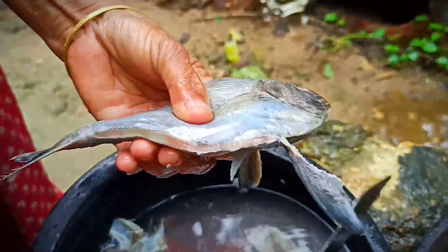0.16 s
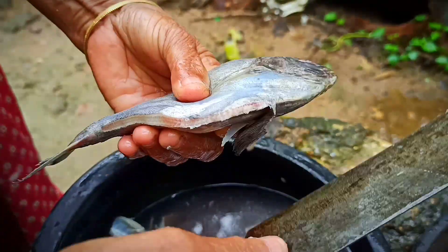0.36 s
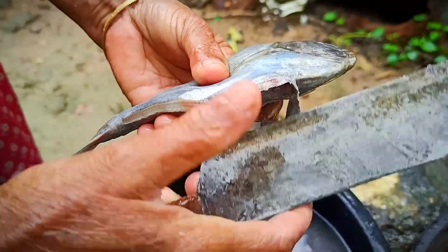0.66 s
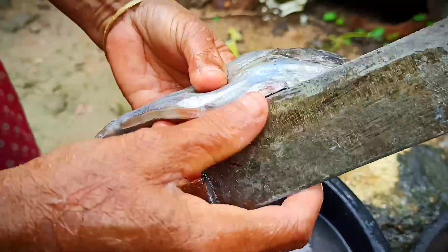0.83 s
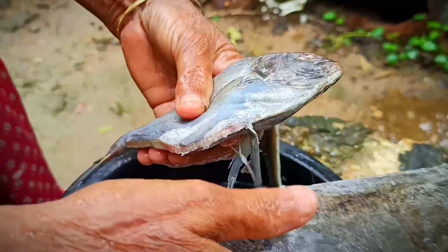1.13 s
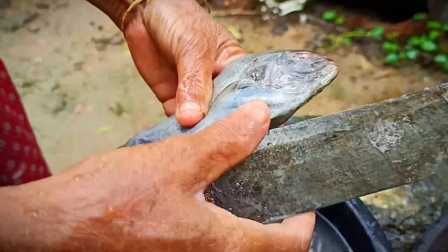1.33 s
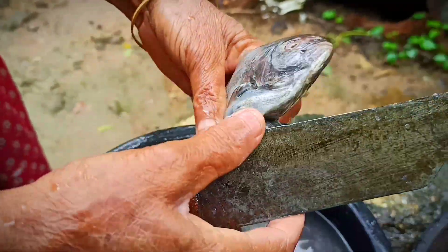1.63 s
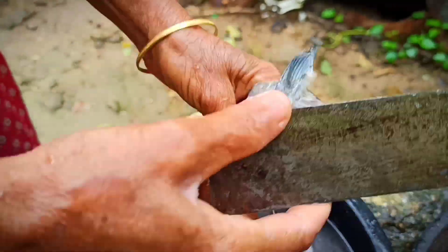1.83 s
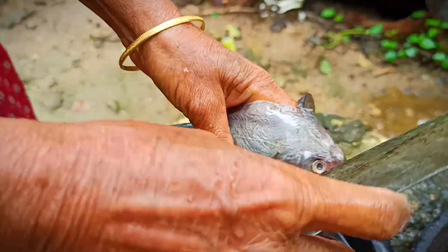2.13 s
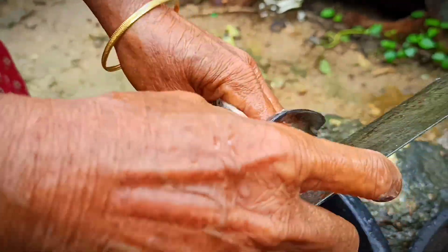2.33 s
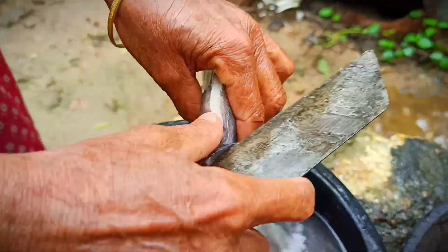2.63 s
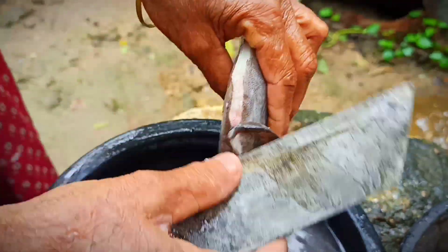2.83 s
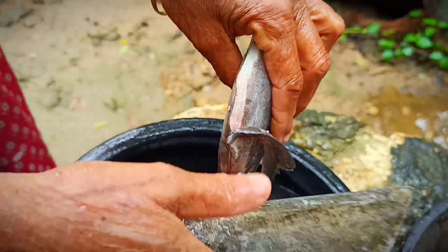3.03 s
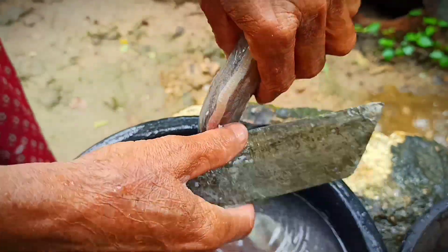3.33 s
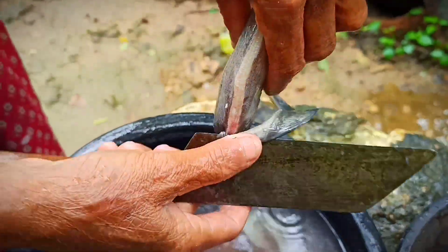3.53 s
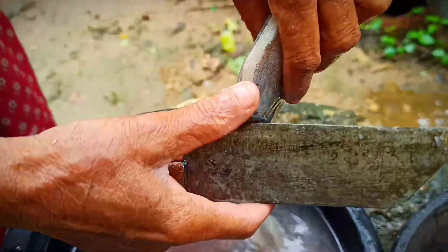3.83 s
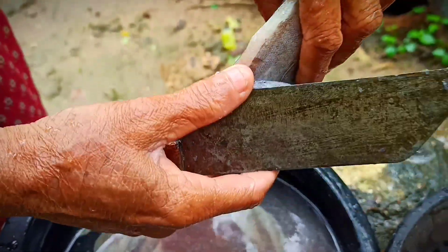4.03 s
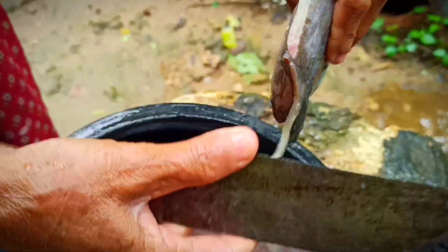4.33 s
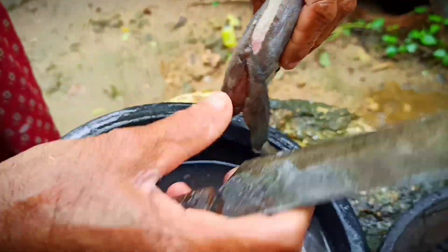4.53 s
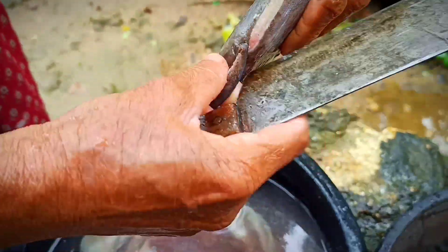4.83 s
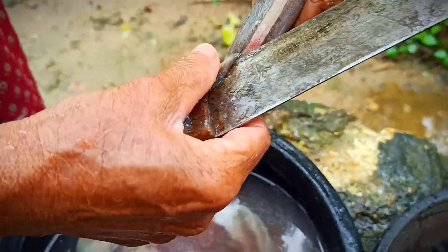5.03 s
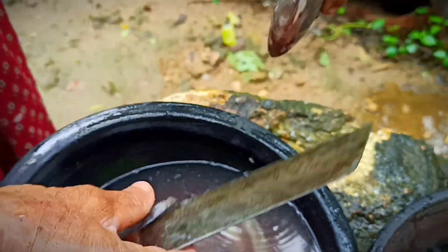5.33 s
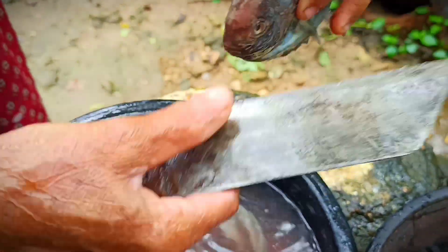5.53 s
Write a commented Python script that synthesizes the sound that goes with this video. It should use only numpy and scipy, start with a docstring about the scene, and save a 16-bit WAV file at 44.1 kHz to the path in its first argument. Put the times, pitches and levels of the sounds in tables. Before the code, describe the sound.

A large knife works on a fish close to the microphone, over a steady outdoor rush. Right at the start comes the loudest moment: the edge rasps over the scales, scales and fin rays snap, the steel rings briefly, the flesh thuds softly and the blade slips off with a zip. Two drops fall into a basin of water at about 0.2 and 0.3 seconds. A far bird chirps faintly until about 1.3 seconds, and again from 2.2 seconds on. Light scrapes and skims over wet skin from 0.9 seconds lead to a few clicks and a second firm, crackling bite near 1.9 seconds. Two more small drops land around 3 seconds. A short scrape with a snap follows at 4.3 seconds, then a small tick and a faint stroke near 5 seconds. A last cluster of snaps comes at 5.6 seconds.

```python
"""Over a steady outdoor rush, a large knife bites into a fish held above a basin, close to a phone.
The edge rasps over the scales, scales and fin rays snap, the steel rings and the flesh thuds softly;
the edge slips off with a zip. Two drops fall and a far bird starts its faint chirps. Light strokes
and skims lead to a second firm bite near 1.9 s and two more drops near 3 s. A short scrape follows
at 4.3 s, and a last cluster of snaps closes the scene at 5.6 s."""
import sys
import numpy as np
from scipy import signal
from scipy.fft import rfft, irfft
from scipy.io import wavfile
from scipy.ndimage import uniform_filter1d, map_coordinates

SR = 44100
rng = np.random.default_rng(int(sys.argv[2]) if len(sys.argv) > 2 else 0)


def waveform_to_disk(signal):
    """Save audio, clipped to [-1, 1], as 16-bit WAV at the path in sys.argv[1]."""
    frames = np.transpose(np.atleast_2d(signal))
    scaled = np.clip(frames, -1, 1) * 32767
    samples = np.round(scaled).astype(np.int16)
    wavfile.write(sys.argv[1], SR, samples)


N = 250488
TIME = np.arange(N) / SR
RING_TIME = TIME[:SR // 4]  # time axis of one short hit
TOP_HZ = 15650

# spectrum of the outdoor rush: (frequency [Hz], relative level [dB])
RUSH_SPECTRUM = [(18, -26), (30, -32), (48, -7.5), (90, -1.5), (145, 0.5), (270, -6), (390, -6),
                 (480, -8.5), (740, -9), (1000, -14), (1250, -14.5), (1750, -13), (2500, -15.5),
                 (6000, -16), (11000, -24.5), (13000, -27.5), (15500, -14.5)]
# strokes of the edge over the scales:
# (time of peak pressure [s], rise [s], level [dB], rasp pitch [Hz], send to the blade [dB])
STROKES = [ (0.011, 0.018, -38, 3120, 5), (0.036, 0.021, -34.5, 4500, 4), (0.208, 0.0226, -51, 3600, -12),
           (0.934, 0.022, -53.5, 3540, 6), (1.565, 0.016, -51.5, 3720, -5.5),
           (1.879, 0.015, -39.5, 3100, 1.5), (1.911, 0.005, -39, 3480, -14),
           (1.945, 0.028, -54, 2770, -16.5), (2.156, 0.017, -59, 4060, 7),
           (4.298, 0.007, -50.5, 4170, -0.5), (5.050, 0.020, -60, 3800, -2), ]
# scales and fin rays snapping: (time [s], level [dB], pitch [Hz], crack relative to level [dB])
SNAPS = [ (0.0025, -29, 2130, 2), (0.0168, -27, 3390, -18), (0.0214, -23, 2835, -7), (0.027, -15, 4800, -8),
         (0.0433, -14, 4250, -10), (0.0547, -26, 3080, 8), (0.1737, -30.5, 3600, -5),
         (1.5630, -38, 3400, -7.5), (1.7673, -43.5, 3700, -2.5), (1.7739, -37.5, 3730, 3.5),
         (1.7890, -37, 4100, -3), (1.8780, -30, 1773, 0.5), (1.9088, -29.5, 2515, -5),
         (1.9092, -29, 3700, -2.5), (1.9146, -30, 4295, -14), (4.2887, -42, 2730, -4),
         (4.2949, -30, 4041, -6), (4.2958, -41, 2170, -13), (4.5380, -43, 4100, -3),
         (5.5843, -40, 4450, -4), (5.6096, -29.5, 2330, -8), (5.613, -26.5, 4223, -9), ]
# modes of the steel, damped by hand and fish: (frequency [Hz], relative gain [dB], t60 [s])
BLADE_MODES = [(1547, 9, .05), (2087, 10.5, 0.058), (2230, -13, 0.041), (2768, 4, 0.067), (2986, 4, 0.087),
               (3023, 6, 0.17), (3512, 11, 0.072), (3990, 13, 0.099), (4213, 4, 0.063), (4596, 7, 0.038),
               (4980, 13.5, 0.067), (5380, 8.5, 0.032), (5940, -39, 0.094), (8883, 10, .052),
               (10290, 13, 0.0284), (10860, 9.5, 0.0197), (11480, 5, 0.02607)]
# hand and fish bumping the blade: (time [s], level [dB], pitch [Hz])
BUMPS = [(0.048, -48.5, 590), (0.050, -47, 195), (0.105, -52, 170.6), (1.912, -50, 177),
         (1.945, -53.5, 460), (5.640, -55.5, 233)]
# blade modes plucked as the tip springs free: (frequency [Hz], push [dB])
TIP_MODES = [(3975, -28.5), (8883, -23.5)]
# drops falling into the basin: (time [s], level [dB], pitch [Hz], t60 [s])
DRIPS = [(0.1735, -23.5, 1380, 0.01), (0.305, -51, 2590, 0.053), (2.819, -44, 3312, 0.051),
         (3.008, -43, 2740, .01)]
# phrases of the far bird: (start [s], rough end [s], chirp spacing [s])
BIRD_PHRASES = [(0.27, 1.26, .33), (2.207, 5.53, .37)]
# light passes over wet skin: (time [s], level [dB])
SKIMS = [(0.915, -61), (1.225, -68.5), (1.430, -63), (2.115, -59.5), (2.160, -61.5), (3.370, -65),
         (4.212, -67)]
# EQ of the microphone behind its port: (frequency [Hz], gain [dB])
MIC_EQ = [(1000, -0.5), (2200, -0.5), (2750, 3.5), (4100, 1), (5200, -7.5), (6000, -6.5), (6700, -19.5),
          (7700, -24), (9200, -15.5), (11100, -9.5), (12900, -14.5), (15500, -23)]


def undb(db):
    """Decibels to gain."""
    return 10 ** (np.asarray(db) / 20)


def unit(x):
    """Scale to rms 1."""
    return x / np.sqrt(np.mean(x ** 2))


def add(out, time, x):
    """Mix x into out, starting at a time in seconds."""
    start = int(round(time * SR))
    x, start = x[max(-start, 0):], max(start, 0)
    out[start:start + len(x)] += x[:max(len(out) - start, 0)]


def fade(t60):
    """Exponential decay that loses 60 dB in t60 seconds."""
    return np.exp(-np.log(1000) * RING_TIME / t60)


def ping(hz, t60, rise_s=0.000095):
    """A damped sine with a quick attack."""
    attack = 1 - np.exp(-RING_TIME / rise_s)
    return attack * np.sin(2 * np.pi * hz * RING_TIME) * fade(t60)


def band(x, hz, q):
    """A band-pass applied twice for steep skirts, gain 1 at its centre."""
    w = 2 * np.pi * min(hz, TOP_HZ) / SR
    a = np.sin(w) / (2 * q)
    section = np.array([a, 0, -a, 1 + a, -2 * np.cos(w), 1 - a]) / (1 + a)
    return signal.sosfilt([section, section], x)


def noise_band(samples, hz, q):
    """Band-passed noise at rms 1."""
    return unit(band(rng.standard_normal(samples), hz, q))


def equalise(x, points, size=8192):
    """Minimum-phase EQ through (frequency [Hz], gain [dB]) points."""
    hz, db = np.transpose(points)
    grid = np.maximum(np.fft.rfftfreq(size, 1 / SR), 1)
    gain = undb(np.interp(np.log(grid), np.log(hz), db))
    cepstrum = irfft(np.log(gain))
    cepstrum[1:size // 2] *= 2
    cepstrum[size // 2 + 1:] = 0
    impulse = irfft(np.exp(rfft(cepstrum)))
    return signal.fftconvolve(x, impulse)[:len(x)]


def drift(rate_hz):
    """Slow modulation: random values joined by straight lines."""
    knots = rng.standard_normal(N // 100)
    return np.interp(TIME * rate_hz, np.arange(len(knots)), knots)


def yard(rush_db=-50.5, rumble_db=-67):
    """The outdoor bed: an even far rush over a low rumble that wavers a little."""
    rush = unit(equalise(rng.standard_normal(N), RUSH_SPECTRUM))
    rush *= undb(rush_db + 0.64 * drift(rate_hz=6.7))
    rumble = noise_band(N, hz=140, q=4.3) * undb(rumble_db + 2 * drift(rate_hz=4.3))
    return rush + rumble


def sliding(force_db=-66, swing_db=3):
    """The resting edge creeps on wet skin; returns the force that keeps the steel faintly astir."""
    return noise_band(N, hz=3300, q=0.45) * undb(force_db + swing_db * drift(rate_hz=7.13))


def strokes(catches_per_s=3400, scatter_db=3, glide_octaves=0.39, firm_db=-29, flesh_db=-19):
    """The edge catches on scale after scale; returns the rasp and the force on the blade."""
    rasp, force = np.zeros(N), np.zeros(N)
    for time, rise, db, hz, send_db in STROKES:
        release = 0.65 * rise
        t = np.arange(-3 * rise, 3 * release, 1 / SR)
        pressure = np.exp(-(t / np.where(t < 0, rise, release)) ** 2)
        sizes = rng.choice([-1, 1], len(t)) * undb(scatter_db * rng.standard_normal(len(t)))
        catches = sizes * (rng.random(len(t)) < catches_per_s / SR)
        # the edge gathers speed, so the rasp climbs in pitch
        speed = 2 ** (glide_octaves * np.tanh(np.minimum(t, release / 2) / rise))
        scrape = map_coordinates(band(catches, hz, q=1.4), [np.cumsum(speed)], mode="mirror")
        fizz = unit(band(catches, hz=6500, q=0.24))
        fizz_db = -8.5 + 0.33 * (firm_db - db)  # lighter strokes are fizzier
        grit = unit(unit(scrape) + undb(fizz_db) * fizz)
        # the soft body of the fish takes the drag as a dull rub
        rub = undb(flesh_db) * noise_band(len(t), hz=520, q=0.81)
        add(rasp, time + t[0], undb(db) * pressure * (grit + rub))
        add(force, time + t[0], undb(db + send_db) * pressure * grit)
    return rasp, force


def snaps(attack_s=0.00031, send_db=-0.5, flick_share=0.44):
    """A scale or fin ray gives with a pitched flick and a tearing crack; returns sound and blade force."""
    sound, force = np.zeros(N), np.zeros(N)
    attack = 1 - np.exp(-RING_TIME / attack_s)
    for time, db, hz, crack_db in SNAPS:
        flick = undb(db) * ping(hz, t60=0.0086)
        tear = noise_band(len(RING_TIME), hz=4800, q=0.18)
        crack = undb(db + crack_db) * attack * tear * fade(t60=0.013)
        add(sound, time, flick + crack)
        add(force, time, undb(send_db) * (flick_share * flick + crack))
    return sound, force


def blade(force, ring_db=-3):
    """The steel rings in its bending modes, driven by the force at the edge."""
    impulse = np.zeros(len(RING_TIME))
    for hz, db, t60 in BLADE_MODES:
        decay = 2 * fade(t60) / fade(t60).sum()  # unity gain at resonance
        impulse += undb(db) * np.cos(2 * np.pi * hz * RING_TIME) * decay
    return undb(ring_db) * signal.fftconvolve(force, impulse)[:N]


def echoes(x, wet_db=-19, t60=0.2):
    """Ground, basin and walls scatter back a weak, short tail."""
    tail = rng.standard_normal(len(RING_TIME)) * fade(t60)
    return undb(wet_db) * signal.fftconvolve(x, tail / np.linalg.norm(tail))[:N]


def bumps(swell_s=0.02):
    """Flesh is soft: its knocks swell and die as dull thuds."""
    out = np.zeros(N)
    t = RING_TIME - RING_TIME.mean()
    pressure = np.exp(-(t / swell_s) ** 2)
    for time, db, hz in BUMPS:
        thud = pressure * noise_band(len(t), hz, q=1.05)
        thud *= np.linalg.norm(pressure) / np.linalg.norm(thud)
        add(out, time + t[0], undb(db) * thud)
    return out


def slip(time=0.056, swell_s=0.0024, zip_db=-28):
    """The edge zips off the fish and the tip springs free; returns the zip and the pluck on the blade."""
    envelope = np.exp(-((TIME - time) / swell_s) ** 2)
    sound = undb(zip_db) * envelope * noise_band(N, hz=11200, q=2.1)
    force = np.zeros(N)
    add(force, time, sum(undb(db) * ping(hz, t60=0.019) for hz, db in TIP_MODES))
    return sound, force


def drips():
    """Each drop rings briefly where it meets the water."""
    out = np.zeros(N)
    for time, db, hz, t60 in DRIPS:
        add(out, time, undb(db) * ping(hz, t60))
    return out


def bird(hz=4600, db=-57.5, swell_s=0.033, glide=-0.03, smear_hz=220, jitter_s=0.011):
    """Thin falling chirps at a nearly even pace, their pitch blurred by distance."""
    out = np.zeros(N)
    t = RING_TIME - RING_TIME.mean()
    envelope = undb(db) * np.exp(-(t / swell_s) ** 2)
    for start, end, spacing in BIRD_PHRASES:
        for time in np.arange(start, end + spacing / 2, spacing):
            blur = unit(uniform_filter1d(rng.standard_normal(len(t)), size=64))
            pitch = hz * (1 + glide * t / swell_s) + smear_hz * blur
            chirp = envelope * np.sin(2 * np.pi * np.cumsum(pitch) / SR)
            add(out, time + t[0] + jitter_s * rng.standard_normal(), chirp)
    return out


def skims(swell_s=0.018, send_db=4):
    """The edge grazes wet skin with a thin fizz; returns the sound and the force on the blade."""
    pressure = sum(undb(db) * np.exp(-((TIME - time) / swell_s) ** 2) for time, db in SKIMS)
    fizz = pressure * noise_band(N, hz=10200, q=0.61)
    return fizz, undb(send_db) * fizz


def scene():
    """Knife, fish and basin up front, bird and yard behind, in mono."""
    contact, force = np.sum([strokes(), snaps(), slip(), skims()], axis=0)
    foreground = contact + blade(force + sliding()) + bumps() + drips()
    return (foreground + echoes(foreground) + bird() + yard())[None]


def record(dry):
    """The phone colours the treble and cuts the top steeply."""
    coloured = np.array([equalise(channel, MIC_EQ) for channel in dry])
    high_cut = signal.ellip(10, 0.2, 70, TOP_HZ, fs=SR, output="sos")
    return signal.sosfilt(high_cut, coloured)


dry = scene()
out = record(dry)
waveform_to_disk(out)
```